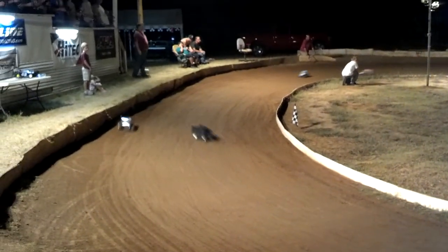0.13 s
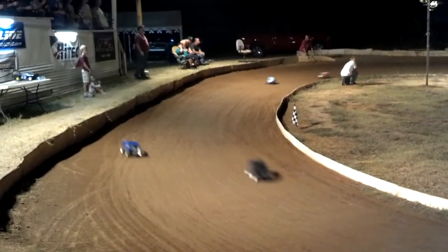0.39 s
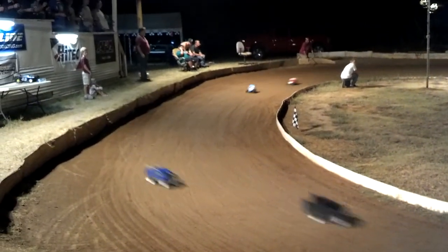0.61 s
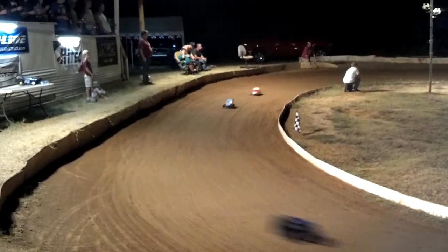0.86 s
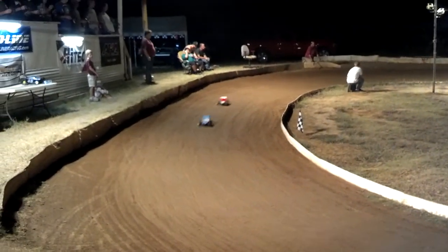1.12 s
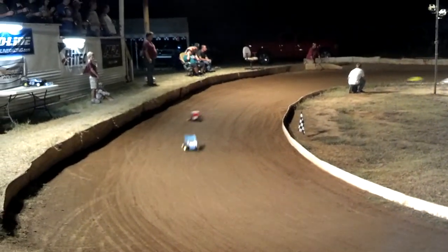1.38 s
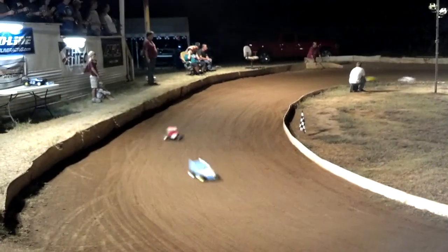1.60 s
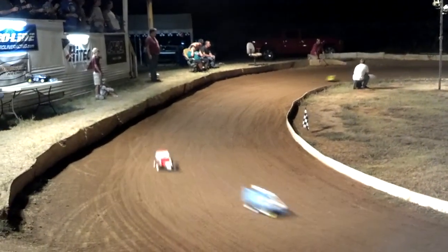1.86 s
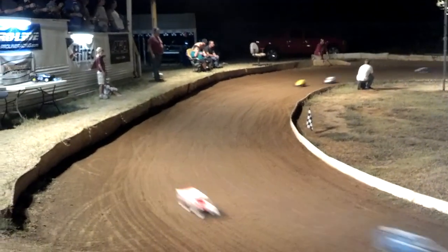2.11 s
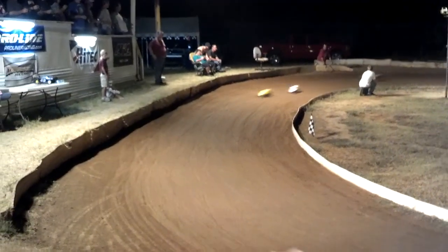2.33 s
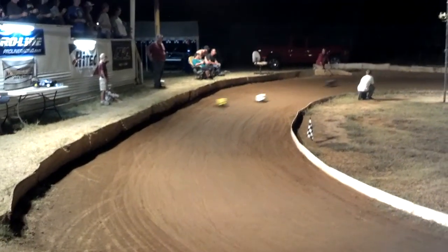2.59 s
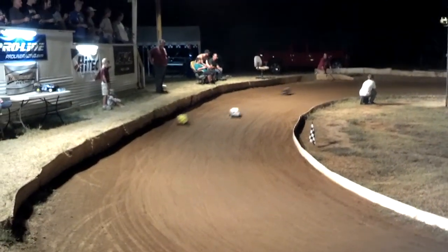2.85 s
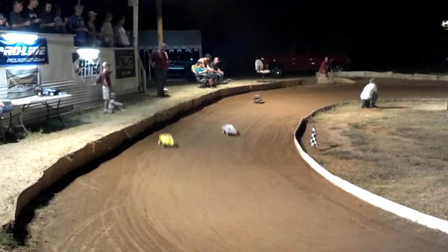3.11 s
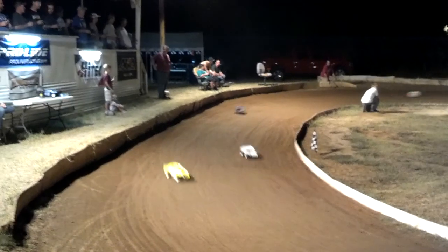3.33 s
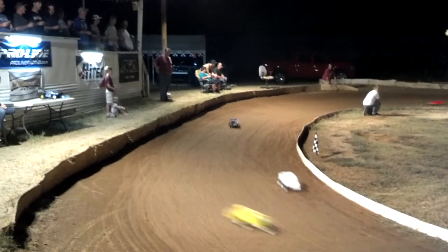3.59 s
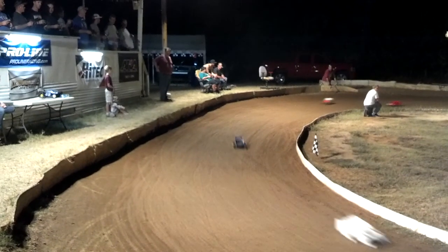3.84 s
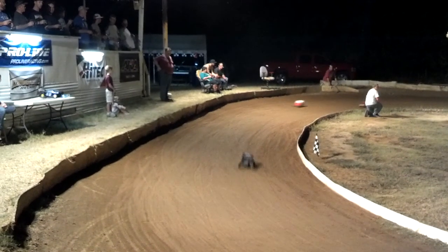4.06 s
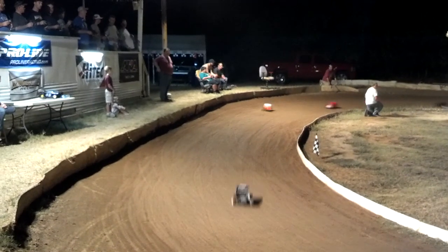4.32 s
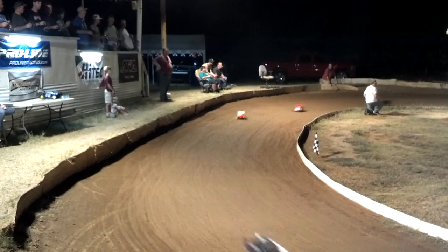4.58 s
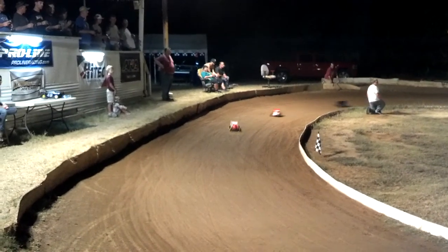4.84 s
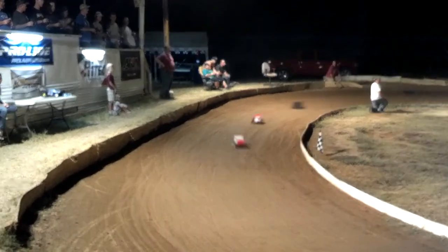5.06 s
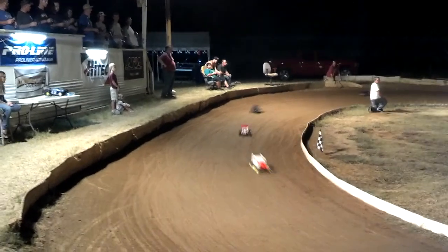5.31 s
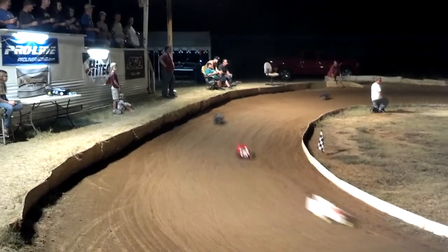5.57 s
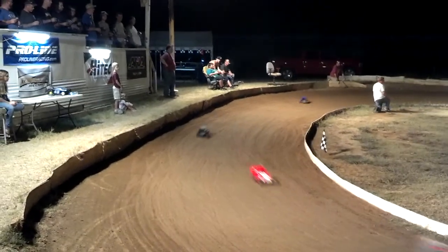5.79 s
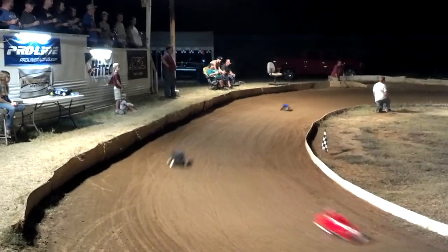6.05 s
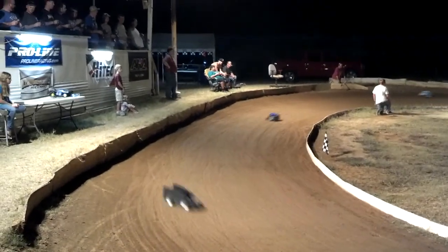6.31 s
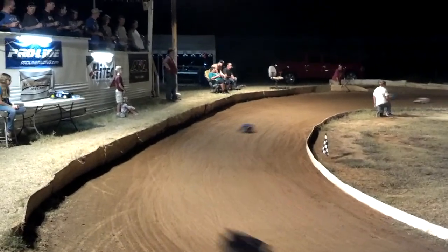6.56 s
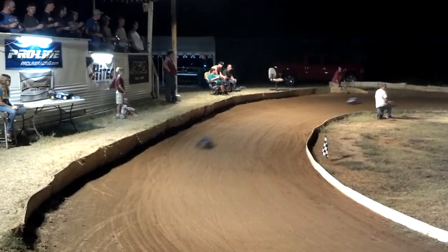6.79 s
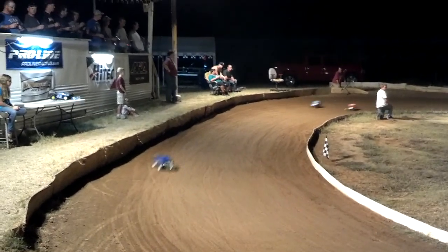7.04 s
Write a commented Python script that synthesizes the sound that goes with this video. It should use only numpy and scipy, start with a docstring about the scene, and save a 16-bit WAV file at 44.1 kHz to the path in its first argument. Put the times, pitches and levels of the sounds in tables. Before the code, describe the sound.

Small electric model cars race around an outdoor dirt oval at night, close to a camera microphone. Their very high, thin gear whines wobble rapidly throughout, joined by brief sliding squeals and fainter lower whines. Tyres rumble unevenly and grit hisses, swelling as cars pass. From under two seconds until about six, short chassis slaps rattle on ruts. The rumble peaks near the end and the whining continues.

```python
"""Small electric model cars lap a dirt oval at night and pass a few metres from a camera.
From the start their gear teeth sing a wobbling whine as wheels slip and bite, over tyre rumble and grit hiss.
From 1.7 s to 6.1 s chassis slap on ruts: short rattles that ring body and thud. A faint hum, one wavering tone,
surfaces near 3 s and 4.5 s. The rumble swells most near 6.4 s, and the whines go on to the end.
Throughout, the camera subtracts from each microphone port a delayed copy of the other."""
import sys
import numpy as np
from scipy import signal
from scipy.fft import rfft, irfft, next_fast_len
from scipy.io import wavfile
from scipy.ndimage import uniform_filter1d

SR = 44100
rng = np.random.default_rng(int(sys.argv[2]) if len(sys.argv) > 2 else 0)


def persist_wave(psi):
    """Save psi, clipped to +-1, as 16-bit WAV."""
    counts = np.round(np.clip(psi, -1, 1) * 32767).astype(np.int16)
    wavfile.write(sys.argv[1], SR, np.atleast_2d(counts).T)


def makeup_ratio(level_db):
    """Linear amplitude ratio for a level in decibels (20 dB per factor of ten)."""
    decades = np.asarray(level_db, float) / 20
    return 10 ** decades


N = 316197
T = np.arange(N) / SR
PORT_LAG = 16  # samples


def cross(ports):
    """Each port minus the delayed other one: a comb of notches in their sum and in their difference."""
    return ports - np.roll(ports[::-1], PORT_LAG, axis=1)


def unit(ports):
    """Scale so that the level after the port subtraction is 0 dB."""
    return ports / np.sqrt(np.mean(cross(ports) ** 2))


def lean(db):
    """Share the power between the ports; db is left port minus right port."""
    left = 1 / (1 + makeup_ratio(-2 * db))
    return np.sqrt([left, 1 - left])


def walk(rate, size=N):
    """Random levels held 1 / rate s and slewed twice; spread near 1."""
    hold = max(int(SR / rate), 1)
    levels = np.repeat(rng.standard_normal(size // hold + 1), hold)
    slewed = uniform_filter1d(uniform_filter1d(levels, hold), hold)
    return 1.4 * slewed[:size]


def colour(x, hz, db, lo_hz=1, hi_hz=SR):
    """Give x a spectrum, keeping the soft-edged band lo-hi."""
    size = next_fast_len(N)
    f = np.arange(size // 2 + 1) * SR / size + 1  # the 1 keeps the logarithm finite
    rise = np.clip(.5 + 3 * np.log2(f / lo_hz), 0, 1)
    fall = np.clip(.5 - 3 * np.log2(f / hi_hz), 0, 1)
    gain = np.sqrt(rise * fall) * makeup_ratio(np.interp(np.log(f), np.log(hz), db))
    return irfft(rfft(x, size) * gain, size)[..., :N]


def gritty(spread_db):
    """Two noises whose short grains differ in size, as stones under a tyre."""
    sizes = np.repeat(makeup_ratio(spread_db * rng.exponential(size=(N // 64 + 1))), 64)[:N]
    return rng.standard_normal((2, N)) * uniform_filter1d(sizes, size=64)


def gears(tables, teeth, side_db, wander, wander_hz, waver_hz, chatter_db, octave_db):
    """Teeth strike at a steady count per turn; an off-centre shaft adds side lines one turn rate apart, also
    round the octave. Each line fades and returns as the paths to the ports change; bumps make the mesh chatter.
    Each table has the columns (time [s], tooth rate [Hz], level [dB], lean [dB])."""
    out = np.zeros((2, N))
    for rows in tables:
        s, hz, db, lean_db = np.transpose(rows)
        start = int(s[0] * SR)
        t = T[start:int(s[-1] * SR)]
        size = len(t)
        rate = np.interp(t, s, hz) * (1 + wander * walk(wander_hz, size))
        turn = 2 * np.pi * np.cumsum(rate / teeth) / SR
        fade = np.clip(np.minimum(t - t[0], t[-1] - t) / 0.012, 0, 1)
        load = fade * makeup_ratio(np.interp(t, s, db) + chatter_db * walk(waver_hz, size))
        # the octave fades out as the tooth rate rises from 8500 to 9000 Hz
        octave = makeup_ratio(octave_db) * np.clip((9000 - rate) / 500, 0, 1)

        def lines(order):
            """Five lines around a multiple of the turn rate, each wavering alone."""
            total = 0
            for k in range(-2, 3):
                angle = (order + k) * turn
                line = walk(waver_hz, size) * np.cos(angle) + walk(waver_hz, size) * np.sin(angle)
                total = total + makeup_ratio(side_db * abs(k)) * line
            return total

        for port, share in enumerate(lean(np.interp(t, s, lean_db))):
            tone, upper = lines(teeth), lines(2 * teeth)
            out[port, start:][:size] += (tone + octave * upper) / tone.std() * share * load
    return out


# the loudest pinion whine (small motor gear), passing from car to car; one row per dip and rise in pitch;
# rates and levels waver around these values:
# (dip time [s], tooth rate [Hz], length of the rise [s], top tooth rate [Hz], level [dB])
LOUDEST_WHINE = [(0.0, 8770, 0.092, 9100, -32.5), (0.189, 8910, 0.077, 9650, -36),
                 (0.361, 8900, 0.079, 9900, -38), (0.51, 9160, .05, 10000, -34.5),
                 (0.62, 9480, .04, 9850, -38.5), (0.697, 9870, 0.031, 9770, -45),
                 (0.82, 7880, 0.13, 10780, -35), (1.0, 8900, 0.016, 9280, -33.5),
                 (1.065, 7610, .05, 10000, -33.5), (1.241, 7640, 0.069, 10250, -33.5),
                 (1.346, 8320, .055, 8710, -29), (1.437, 8850, 0.038, 9940, -31),
                 (1.56, 8380, 0.095, 10030, -36), (1.69, 9650, .04, 9960, -25.5),
                 (1.8, 9500, 0.085, 10300, -33.5), (1.95, 9400, 0.045, 9840, -41),
                 (2.039, 9400, .11, 10630, -31), (2.19, 8940, 0.14, 10600, -34.5),
                 (2.46, 8940, 0.06, 10600, -34), (2.582, 9700, 0.062, 10350, -41),
                 (2.71, 8000, 0.13, 9300, -40.5), (2.92, 9000, .06, 9800, -40),
                 (3.05, 9080, 0.16, 10200, -34.5), (3.296, 9050, 0.074, 10050, -30.5),
                 (3.455, 8960, 0.08, 9600, -29.5), (3.575, 9200, 0.052, 9750, -33),
                 (3.703, 7940, 0.066, 9970, -36), (3.87, 8260, 0.078, 9250, -31.5),
                 (4.005, 8030, 0.099, 9350, -31.5), (4.146, 8080, 0.14, 9150, -32),
                 (4.337, 7950, 0.14, 9600, -33.5), (4.56, 7860, 0.096, 9600, -28),
                 (4.704, 7940, .075, 8980, -36), (4.844, 8060, .055, 8970, -40),
                 (5.031, 8360, .09, 9100, -37), (5.18, 8290, 0.11, 8980, -38.5),
                 (5.4, 8200, 0.092, 9430, -34), (5.545, 7850, 0.064, 9400, -33),
                 (5.693, 8430, 0.094, 9050, -37), (5.82, 8940, .08, 9250, -33.5),
                 (5.95, 8970, 0.037, 9240, -35.5), (6.076, 8000, 0.051, 8800, -45),
                 (6.204, 8240, .12, 9600, -47), (6.35, 9300, .04, 9700, -46),
                 (6.455, 7040, 0.038, 8000, -34.5), (6.545, 7430, 0.074, 10400, -32),
                 (6.659, 7970, 0.032, 8350, -43), (6.733, 7410, 0.082, 10000, -38.5),
                 (6.89, 8460, 0.072, 10300, -31), (7.04, 8100, 0.042, 9920, -39),
                 (7.165, 8000, 0.033, 8600, -37)]
DIP_DB = 0.5  # dips in pitch against tops
PINION_LEAN_DB, PINION_SWAY_DB = 9.5, 8.5  # left port minus right port: usual value, random sway


def slipping():
    """The tooth rate sags as wheels bite and rises as they slip; the mesh is slightly louder in the dips."""
    dip_s, dip_hz, rise_s, top_hz, db = np.transpose(LOUDEST_WHINE)
    # the top comes before the next dip
    top_s = dip_s + np.minimum(rise_s, .85 * np.diff(dip_s, append=N / SR + 1))
    turns_s, turns_hz = np.ravel([dip_s, top_s], "F"), np.ravel([dip_hz, top_hz], "F")
    t = T[::128]
    count = np.arange(len(turns_s))
    step = np.interp(t, turns_s, count)  # even at a dip, odd at a top
    eased = step - np.sin(2 * np.pi * step) / (2 * np.pi) * 0.59
    level_db = np.interp(t, (dip_s + top_s) / 2, db) + DIP_DB * np.cos(np.pi * step) / 2
    level_db = level_db + 1.5 * walk(25)[::128]
    hz = np.interp(eased, count, turns_hz) * (1 + .012 * walk(30)[::128])
    return np.transpose([t, hz, level_db, PINION_LEAN_DB + PINION_SWAY_DB * walk(8)[::128]])


EDGE_DB = -14.5  # a brief whine at its start and end, against its peak
BUMP_S = .04  # time between bumps


def glides(rows, lean_db, power, wobble, broken_db):
    """Each whine swells, holds and fades while its rate slides between two values; bumps shake and break it."""
    tables = []
    for s, length, hz0, hz1, db in rows:
        u = np.linspace(0, 1, 129)
        bumps = rng.standard_normal((2, 32))
        shake, gaps = (np.interp(u * length / BUMP_S, np.arange(32), b) for b in bumps)
        hz = (hz0 + (hz1 - hz0) * u) * (1 + wobble * shake)
        level_db = db + EDGE_DB * abs(2 * u - 1) ** power + broken_db * gaps
        tables.append(np.transpose([s + length * u, hz, level_db, lean_db + 0 * u]))
    return tables


# other brief whines, some of them high upper-octave blips of the main whine, before bumps shake them:
# (start time [s], length [s], from rate [Hz], to rate [Hz], peak level [dB])
BRIEF_WHINES = [(0.0, 0.11, 11800, 10700, -35), (0.08, 0.12, 10700, 12200, -32),
                (0.26, 0.14, 8570, 9660, -38), (0.49, 0.075, 8930, 10080, -43),
                (0.79, 0.12, 10200, 8540, -30.5), (0.8, 0.04, 12970, 15300, -32),
                (1.23, 0.05, 12050, 16050, -34), (1.29, 0.1, 7920, 8850, -27.5),
                (1.6, 0.087, 9900, 10440, -31.5), (1.85, 0.14, 6860, 8400, -44),
                (2.0, 0.12, 8970, 9740, -49), (2.33, 0.09, 10240, 16100, -45), (2.36, 0.1, 9030, 9300, -33),
                (2.62, 0.39, 10200, 10700, -36.5), (2.64, 0.13, 6700, 8030, -47),
                (2.78, 0.1, 7700, 7550, -42), (3.06, 0.12, 10300, 11400, -38),
                (3.24, 0.13, 8050, 7800, -38), (3.35, 0.15, 7800, 8580, -40),
                (3.68, 0.11, 9990, 10400, -37), (3.8, 0.044, 9620, 8500, -27.5),
                (3.87, 0.084, 10120, 9700, -41), (5.0, 0.22, 10100, 10640, -42.5),
                (5.35, 0.17, 10500, 11770, -36), (5.59, 0.094, 10300, 12320, -33),
                (5.72, 0.18, 10400, 11000, -39), (5.92, 0.13, 9900, 13070, -34.5),
                (6.25, 0.2, 12200, 13120, -39), (6.33, 0.17, 5600, 5500, -38),
                (6.6, 0.078, 10220, 13840, -46), (6.7, 0.052, 14300, 15200, -37)]


def pinions(hiss_db, top_db, lean_db):
    """High whine of gear teeth: the loudest pinion, other brief whines and cars further round the oval."""
    brief = glides(BRIEF_WHINES, 5, power=1.9, wobble=0.0057, broken_db=2.5)
    tables = [slipping()] + brief + far_cars(hiss_db, top_db, lean_db)
    return gears(tables, teeth=27.5, side_db=-7.3, wander=.008, wander_hz=140,
                 waver_hz=155, chatter_db=2, octave_db=-6.0)


# lower whine of the axle gears, before bumps shake it:
# (start time [s], length [s], from rate [Hz], to rate [Hz], peak level [dB])
AXLE_WHINES = [(0.03, 0.3, 3950, 4250, -46), (0.33, 0.35, 4300, 3950, -49), (0.7, 0.2, 4050, 4600, -47),
               (0.08, 0.18, 597, 625, -45), (0.12, 0.22, 2000, 1900, -47), (0.42, 0.22, 1900, 1930, -40),
               (0.68, 0.16, 1850, 2050, -41), (0.46, 0.18, 4900, 5050, -42), (0.5, 0.37, 2200, 3050, -39),
               (1.08, 0.44, 3600, 3830, -47), (1.47, 0.28, 3880, 3720, -46), (1.7, 0.28, 3850, 3780, -48),
               (1.93, 0.36, 3840, 3800, -44), (2.26, 0.23, 3780, 4150, -45), (1.42, 0.15, 3950, 4200, -46),
               (2.22, 0.2, 5400, 6500, -43), (2.23, 0.13, 4430, 4900, -44), (2.41, 0.15, 2050, 2110, -45),
               (2.7, 0.68, 2110, 2010, -39), (3.4, 0.2, 2030, 2050, -42), (3.35, 0.09, 3900, 3550, -42),
               (3.64, 0.11, 1950, 1780, -36), (3.8, 0.2, 1920, 2030, -39), (3.52, 0.2, 4250, 4680, -52),
               (3.78, 0.07, 4550, 4350, -45), (4.24, 0.07, 1350, 1500, -37), (4.29, 0.08, 1480, 1290, -37),
               (4.37, 0.08, 1330, 1480, -37), (4.57, 0.14, 3950, 4150, -44), (4.72, 0.42, 3950, 4050, -48),
               (5.13, 0.17, 3700, 3720, -44), (5.3, 0.38, 4030, 4120, -40), (5.64, 0.4, 3950, 4040, -48),
               (6.02, 0.1, 3900, 3550, -44), (6.61, 0.12, 3900, 4020, -41), (6.68, 0.17, 3990, 3660, -39),
               (6.82, 0.24, 3780, 3600, -45)]


def axles():
    """Lower whine of the axle gear teeth, sliding in rate with weaker octaves."""
    tables = glides(AXLE_WHINES, 5, power=3.3, wobble=.009, broken_db=1.6)
    return gears(tables, teeth=30.5, side_db=-8, wander=.01, wander_hz=30,
                 waver_hz=60, chatter_db=1.5, octave_db=-19.0)


# the pack as it nears and leaves: (time [s], tyre rumble level [dB], grit hiss level [dB], top hiss level [dB])
CAR_LEVELS = [(0.0, -37, -39, -40), (0.31, -39, -40, -49), (0.55, -33, -35, -41), (0.799, -31.5, -41, -46),
              (1.0, -36, -40.5, -38), (1.25, -42, -45, -44), (1.55, -44.5, -44.5, -39.5),
              (1.9, -42.5, -46.5, -58), (2.15, -38.5, -41.5, -47), (2.6, -38.5, -41.5, -46),
              (3.05, -36.5, -37.5, -39.5), (3.45, -38.5, -42, -44.5), (3.901, -37.5, -42, -42.5),
              (4.35, -38, -40.5, -37), (4.619, -41, -40.5, -43.5), (5.15, -40, -41, -39.5),
              (5.5, -34, -38, -48), (5.801, -34.5, -40.5, -38.5), (6.35, -29, -37, -53),
              (6.62, -36.5, -42, -47), (6.9, -37, -40.5, -40.5), (7.17, -41.5, -43.5, -39)]
# a near car crosses a rough patch: (time of the middle [s], rumble change [dB], grit change [dB])
ROUGH_PATCHES = [(0.558, 2, -1), (0.62, 1, -1), (0.77, 4.5, 6), (2.07, 1, 0), (2.2, 2.5, -6),
                 (2.38, 4, 0.5), (2.92, 3, 0.5), (3.11, 2, 2), (3.28, 2, 3), (3.55, 3, -1), (3.69, 10, 2.5),
                 (3.809, 4, 5.5), (4.07, 4.5, -0.5), (4.7, 4.5, 2), (4.87, 4.5, 2), (5.3, 0, 3),
                 (5.58, 5.5, 1.5), (5.83, 4.5, 0.5), (6.08, -0.5, -3.5), (6.52, 2.5, 1.5)]
PATCH_S = 0.028  # spread of a patch in time
PACK_LEAN_DB, PACK_SWAY_DB = 2.5, 9.5  # left port minus right port: usual value, random sway


def pack():
    """Levels of rumble, hiss and top hiss with the rough patches on top, and the side the pack leans to."""
    s, *columns = np.transpose(CAR_LEVELS)
    rumble_db, hiss_db, top_db = (np.interp(T, s, c) for c in columns)
    at, *rises = np.transpose(ROUGH_PATCHES)
    coarse = T[::128]
    shape = np.exp(-.5 * ((coarse - at[:, None]) / PATCH_S) ** 2)
    rumble_up, grit_up = (np.interp(T, coarse, r @ shape) for r in rises)
    return (rumble_db + rumble_up + 0.68 * walk(14),
            hiss_db + grit_up + 0.76 * walk(16),
            top_db + grit_up + 3 * walk(14),
            PACK_LEAN_DB + PACK_SWAY_DB * walk(12))


# tyre rumble spectrum, relative: (frequency [Hz], alike at both ports [dB], opposite at the ports [dB])
RUMBLE_SPECTRUM = [(39.8, 17, -20), (65.6, -9, -18), (97, 13, -24), (141, 13.5, -33), (292, 18, -4.5),
                   (387, 15.5, 5), (463, 13.5, 7), (582, 19, 5.5), (840, 15.5, 9.5), (1055, 16.5, 7.5),
                   (1490, 9.5, 13), (1870, 9.5, 12), (2560, -3, -2)]
LOW_ROAR_DB, PASS_DB = -45.5, -35  # roar below 450 Hz when the rumble stands at its usual level, PASS_DB


def tyres(rumble_db):
    """Rumble in three bands with their own bumps; the long waves reach both ports alike, and the lowest
    ones come from all round the oval, so they swell less with a passing car."""
    hz, alike_db, opposite_db = np.transpose(RUMBLE_SPECTRUM)
    bands = []
    for lo, hi, grain_db in [(1, 450, 1.1), (450, 1200, 1.4), (1200, SR, 1.6)]:
        noise = gritty(grain_db) * makeup_ratio(1.02 * walk(20))
        alike = colour(noise[0], hz, alike_db, lo, hi)
        opposite = colour(noise[1], hz, opposite_db, lo, hi)
        bands.append(lean(1.5)[:, None] * [alike + opposite, alike - opposite])
    swell_db = rumble_db - PASS_DB
    roar = unit(bands[0]) * makeup_ratio(LOW_ROAR_DB + 0.49 * swell_db)
    upper = unit(bands[1] + bands[2] * makeup_ratio(-.3 * swell_db)) * makeup_ratio(rumble_db)
    return roar + upper


# grit hiss spectrum, relative: (frequency [Hz], level [dB])
HISS_SPECTRUM = [(900, -29), (1600, -6.5), (2400, 6.5), (3000, 0), (4000, 2.5), (6500, 1.5), (7400, 0),
                 (8600, 5), (10000, 4.5), (11400, -1), (13000, -4), (14500, -0.5), (16000, 1.5)]


def grit(hiss_db, top_db, lean_db):
    """Hiss in bands that flicker alone; the top follows the sprays of dirt."""
    hz, db = np.transpose(HISS_SPECTRUM)
    edges, low, top = 900 * 2 ** np.arange(0, 4.5, .5), 0, 0
    for lo, hi in zip(edges[:-1], edges[1:]):
        low = low + colour(gritty(1.5), hz, db, lo, min(hi, 11500)) * makeup_ratio(1.2 * walk(15))
    for lo, hi in [(11500, 12800), (12800, 14200), (14200, 17000)]:
        top = top + colour(gritty(1.5), hz, db, lo, hi) * makeup_ratio(2 * walk(12))
    # hiss_db sets the level between 2400 and 7000 Hz
    mid = np.sqrt(np.mean(colour(low, [1, 2], [0, 0], 2400, 7000) ** 2))
    low = low / mid * makeup_ratio(hiss_db) * lean(lean_db)
    return low + top / top.std() * makeup_ratio(top_db) * lean(lean_db - 10)


# chassis slapping a rut: (time [s], peak level of the body sound [dB], low thud against it [dB])
RUT_SLAPS = [(1.664, -28, -33.5), (2.055, -26.5, -22), (3.444, -29.5, -16), (3.671, -33, -12),
             (3.773, -28.5, -24), (4.052, -29, 17.5), (4.379, -26, -11), (5.81, -30, -28),
             (6.067, -24, -23)]
# ringing of the chassis body: (frequency [Hz], relative level [dB], time to fall by 60 dB [s])
BODY_MODES = [(662, -24, 0.074), (958, 14, 0.034), (1223, 4, 0.043), (1827, -8, 0.037)]
# ringing of the low thud: (frequency [Hz], relative level [dB], time to fall by 60 dB [s])
THUD_MODES = [(110, -16, 0.079), (165, -4, 0.052), (238, 4.5, 0.038), (348, -0.5, 0.21), (425, -5, 0.047)]


def slaps():
    """The front then the rear of the chassis hits, 15 ms apart; a short rattle drives its modes."""
    out, t = np.zeros((2, N)), T[:int(.25 * SR)]
    ring = [sum(makeup_ratio(db) * np.sin(2 * np.pi * hz * t) * makeup_ratio(-60 * t / t60) for hz, db, t60 in modes)
            for modes in (BODY_MODES, THUD_MODES)]
    for s, db, thud_db in RUT_SLAPS:
        front = np.exp(-t / 0.003)
        rear = 1.63 * (t > .015) * np.exp(-abs(t - .015) / 0.0023)
        rattle = rng.standard_normal(len(t)) * (front + rear)
        body, thud = (signal.fftconvolve(rattle, r)[:len(t)] for r in ring)
        hit = makeup_ratio(db) * (body / abs(body).max() + makeup_ratio(thud_db) * thud / abs(thud).max())
        out[:, int(s * SR):][:, :len(t)] += hit * lean(5.0)[:, None]
    return out


# faint gears of cars further round the oval:
# (usual tooth rate [Hz], swing as a share of the rate [1], usual level against the hiss [dB])
FAR_WHINES = [(4410, .04, -19), (6460, 0.062, -15.5), (7220, 0.065, -16), (9300, .06, -10),
              (12200, .07, -14), (13160, 0.074, -8.5), (14900, .04, -12)]


def far_cars(hiss_db, top_db, lean_db):
    """Throttle and wheel slip swing each far whine at random; it surfaces from the hiss and sinks again."""
    tables = []
    for hz, swing, db in FAR_WHINES:
        rate = hz * (1 + swing * walk(9))
        level_db = db + (hiss_db if hz < 9000 else top_db) + 4 * walk(6)
        tables.append(np.transpose([T, rate, level_db, lean_db])[::1024])
    return tables


# a faint wavering hum, perhaps a generator: (time [s], level [dB])
HUM_LEVELS = [(2.3, -81), (2.7, -60), (3.05, -57.5), (3.3, -88), (4.3, -84), (4.45, -54), (4.75, -61),
              (4.95, -73)]


def hum():
    """One low tone of wavering pitch around 189.5 Hz, the same at both ports."""
    tone = np.sin(2 * np.pi * np.cumsum(189.5 * (1 + 0.0142 * walk(8.6))) / SR)
    return unit(np.array([tone, tone])) * makeup_ratio(np.interp(T, *np.transpose(HUM_LEVELS)))


def port_noise():
    """Low noise of each microphone channel, unrelated left and right."""
    noise = colour(rng.standard_normal((2, N)), [30, 90, 200, 450, 900], [-18, -1, -3, -2.0, -22], hi_hz=1000)
    return noise / noise.std() * makeup_ratio(-65)


def scene():
    """Sound at the two microphone ports."""
    rumble_db, hiss_db, top_db, lean_db = pack()
    whines = pinions(hiss_db, top_db, lean_db) + axles()
    ground = tyres(rumble_db) + grit(hiss_db, top_db, lean_db)
    return whines + ground + slaps() + hum()


def band_limit(x):
    """A steep low-pass at the top of the band."""
    return signal.sosfilt(signal.butter(12, 16000, fs=SR, output="sos"), x)


def record(dry):
    """The camera: port subtraction, channel noise, then bass and top cut."""
    bass_cut = signal.butter(2, 85, "high", fs=SR, output="sos")
    top_cut = signal.ellip(12, .2, 70, 15720, fs=SR, output="sos")
    mix = signal.sosfilt(np.vstack([bass_cut, top_cut]), cross(dry) + port_noise())
    return band_limit(mix)


dry = scene()
out = record(dry)
persist_wave(out)
```